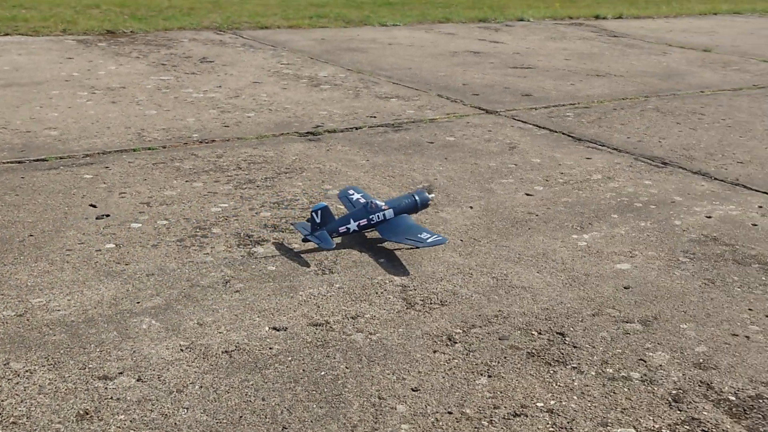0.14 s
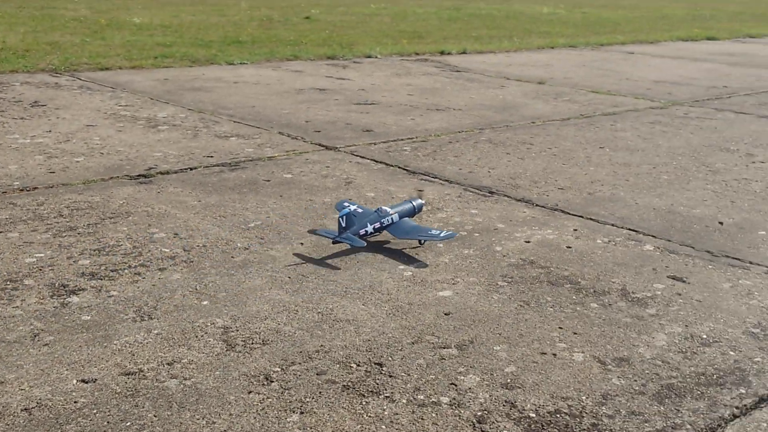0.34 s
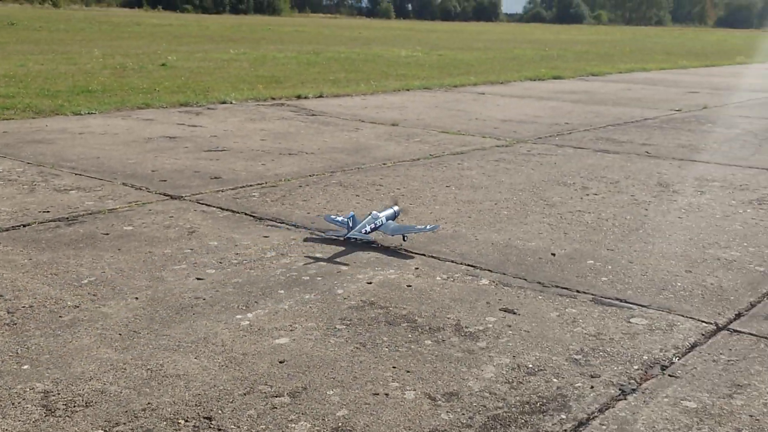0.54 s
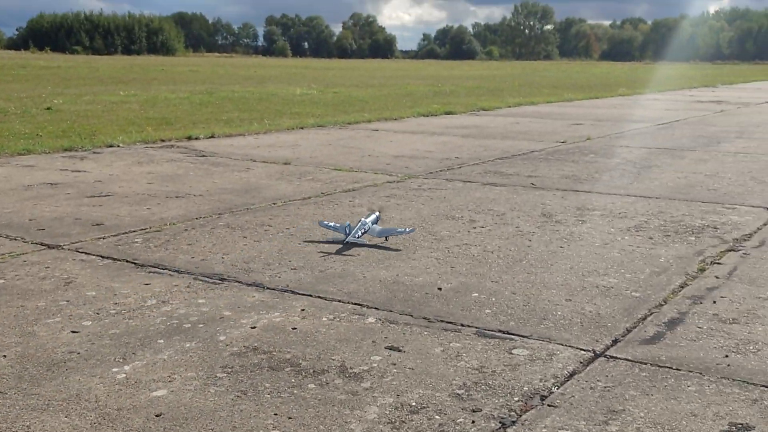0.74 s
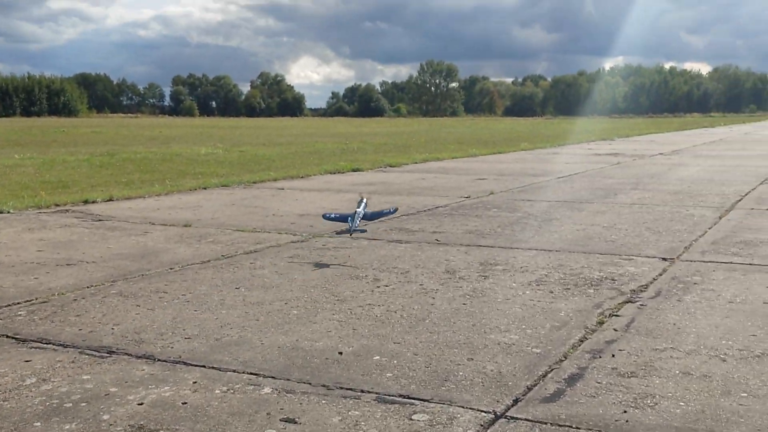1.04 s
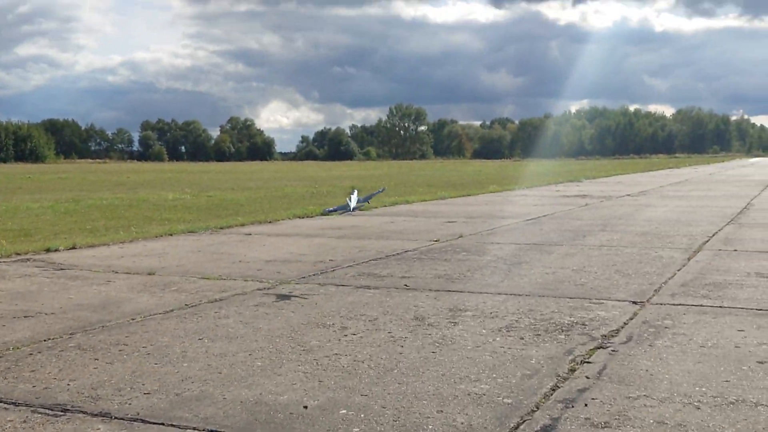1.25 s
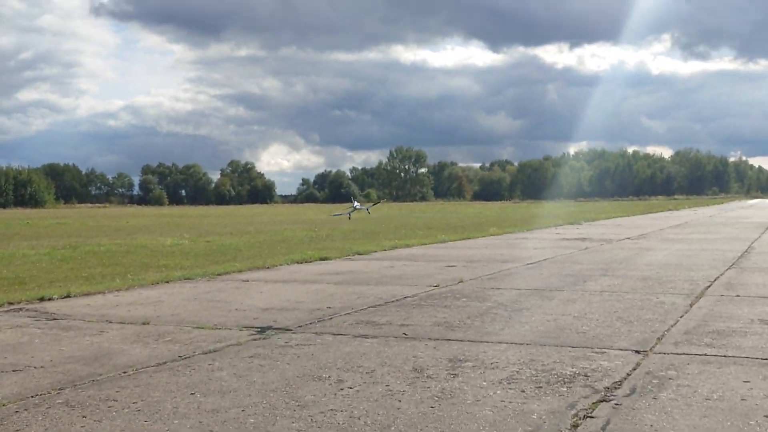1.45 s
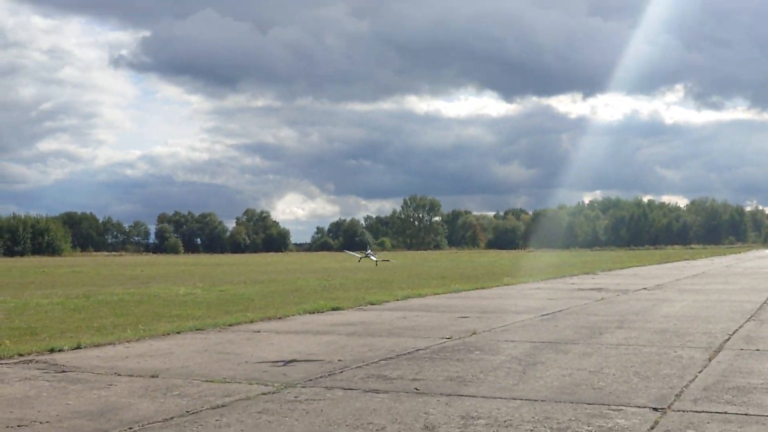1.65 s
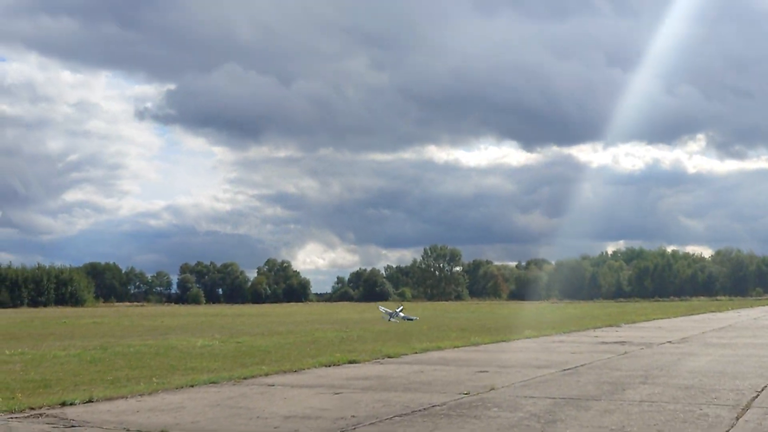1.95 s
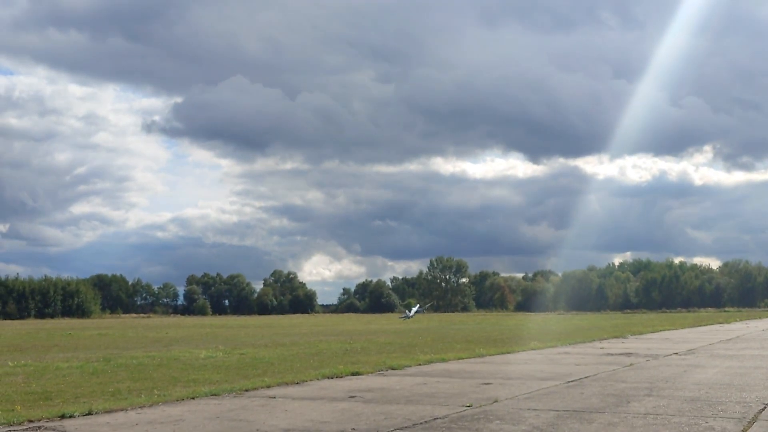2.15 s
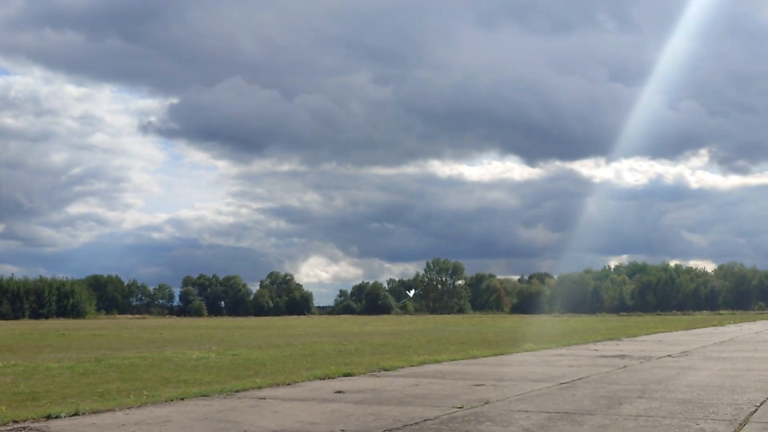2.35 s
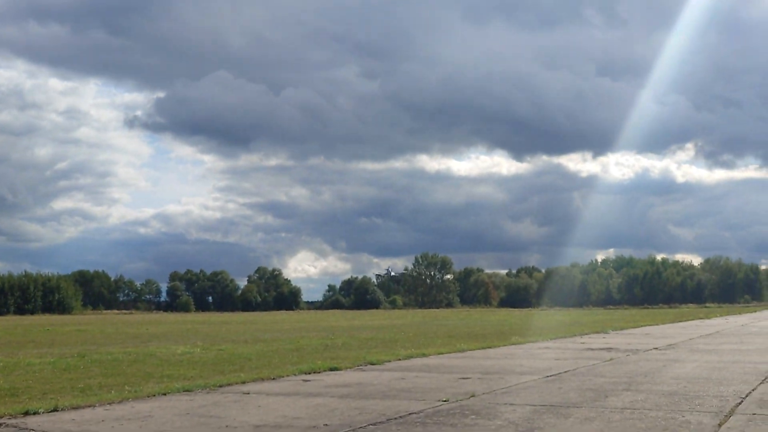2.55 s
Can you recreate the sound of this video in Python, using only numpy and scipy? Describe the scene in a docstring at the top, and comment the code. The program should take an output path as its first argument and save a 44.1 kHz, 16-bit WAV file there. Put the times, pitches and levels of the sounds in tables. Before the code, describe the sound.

A small electric model plane starts close with a shrill whine, propeller rush and wheels clattering over concrete, then lifts off and fades to a faint wavering whine; wind rumbles on the microphone in an open field.

```python
"""On an open field, a small electric model plane runs up a concrete strip, lifts off and climbs away.
Motor whine, bearing tones and whirr follow the shaft speed; at eased throttle the speed controller sings.
Blade-chopped noise makes the propeller wash, which fades with distance.
Grit and joints under the wheels set the foam airframe ringing.
Wind rumbles and flutters at the microphone, with a few dull knocks close by and a faint open-air floor."""
import sys
import numpy as np
from scipy import signal
from scipy.fft import rfft, irfft
from scipy.io import wavfile
from scipy.ndimage import uniform_filter1d, map_coordinates

SR = 44100
rng = np.random.default_rng(int(sys.argv[2]) if len(sys.argv) > 2 else 0)


def unload_audio(sound):
    """Save the sound as a 16-bit wav file, at the path given as the first command line argument."""
    columns = np.transpose(np.atleast_2d(sound))
    # keep every value between -1 and 1, then stretch to whole-number steps
    steps = np.round(np.clip(columns, -1, 1) * 32767)
    wavfile.write(sys.argv[1], SR, steps.astype(np.int16))


N = 119070
T = np.arange(N) / SR  # s
WHINE_ORDER = 42  # whine cycles per shaft turn

# whirr of the motor in flight, which also leads its airborne tones: t/s, level/dB
WHIRR_LEVEL = [(0, -67), (1.3, -54.5), (1.55, -52.5), (1.75, -61.5), (1.92, -70), (2.1, -65), (2.3, -55.5),
               (2.42, -55.5), (2.55, -60.5), (2.7, -68.5)]


def motor(shaft):
    """Magnetic whine, two bearing tones, and weaker tones that swell as they cross resonances in flight."""
    # whine: t/s, level/dB
    whine_level = [(0, -35), (.05, -28.5), (.13, -29.5), (.29, -37.5), (.5, -40.5), (.63, -50), (.69, -48),
                   (.82, -42.5), (1.16, -48.5), (1.22, -44.5), (1.33, -53), (1.57, -52.5), (1.61, -67),
                   (1.72, -69), (1.9, -74), (2.03, -60), (2.1, -79), (2.15, -65), (2.22, -55),
                   (2.32, -45.5), (2.44, -57.5), (2.7, -67)]
    # upper and lower bearing tone: t/s, level/dB
    bearing_level = [(0, -61), (.3, -49.5), (.6, -49.5), (1.0, -53), (1.3, -61.5), (1.5, -65), (1.58, -64),
                     (1.67, -62.5), (1.76, -73), (1.87, -69), (1.98, -105), (2.2, -76), (2.55, -85),
                     (2.7, -92)]
    low_bearing_level = [(0, -48), (1.1, -54), (1.5, -83), (1.72, -78), (1.98, -79), (2.19, -76),
                         (2.34, -63), (2.47, -69), (2.7, -76)]
    # weaker shaft and bearing tones: multiple of the shaft rate, relative level/dB on the ground,
    # level/dB relative to each other in the air
    weak_tones = [(3.037, -60, 3), (4.02, -49, 4.5), (4.315, -50.5, -25), (5.72, -50, -20),
                  (6.59, -53.5, -9), (9.12, -49, -16), (13.06, -54.5, 7), (15.98, -51, -12),
                  (20.72, -60, 0), (22.3, -58, -9), (30.4, -60, -8), (33.1, -84, -1), (33.36, -81, -8.5),
                  (34.5, -81, -4.5), (37.3, -61, 8.5)]
    # fade of the ground tones, heard close by: t/s, relative level/dB
    nearness = [(0, 1.5), (.7, -3), (1.2, -11.5), (1.45, -20.5), (1.7, -52), (2.7, -60)]
    # resonances that the airborne tones cross: f/Hz, relative level/dB
    tone_colour = [(300, -15), (520, -17.5), (850, -8), (1350, 3), (1550, -19), (2200, -23), (2750, -1),
                   (3100, -5.5), (3600, 3), (4050, -14), (4420, 3), (4800, -4.5), (5500, -12)]
    bearing_order, low_bearing_order = 26.5, 10.35  # multiples of the shaft rate
    waver_db, air_tones_db = 4, -5.5  # spread of each weak tone; airborne tones against the whirr

    whine = from_db(curve(whine_level) + 1.0 * drift(24)) * tone(WHINE_ORDER * shaft, jitter=0.00071)
    bearing = from_db(curve(bearing_level) + 3.0 * drift(45)) * tone(bearing_order * shaft, jitter=0.0038)
    low_level = from_db(curve(low_bearing_level) + 2.0 * drift(15))
    low_bearing = low_level * tone(low_bearing_order * shaft, jitter=0.0051)
    ground, air = 0, 0
    for multiple, ground_db, air_db in weak_tones:
        partial = from_db(waver_db * drift(13.7)) * tone(multiple * shaft, jitter=0.00701)
        ground = ground + from_db(ground_db) * partial
        air = air + from_db(air_db) * partial
    close_tones = from_db(curve(nearness)) * ground
    flying_tones = from_db(curve(WHIRR_LEVEL) + air_tones_db) * coloured(air, tone_colour)
    return whine + bearing + low_bearing + close_tones + flying_tones


def controller(shaft):
    """Steady switching tone at part throttle, with a sideband each side that follows the shaft."""
    # switching tone: t/s, level/dB
    switching_level = [(0, -110), (1.59, -100), (1.635, -53.5), (1.685, -65), (1.73, -52.5), (1.8, -47),
                       (1.9, -64.5), (1.935, -49), (1.99, -47), (2.035, -65), (2.07, -51.5), (2.17, -52),
                       (2.33, -61.5), (2.41, -53.5), (2.53, -72), (2.57, -55.5), (2.64, -46.5), (2.7, -51)]
    switch_hz, sideband_order, sideband_db = 7827, 4, -21.5
    sides = 0
    for sign in (-1, 1):
        sides = sides + tone(switch_hz + sign * sideband_order * shaft, jitter=0.00087)
    carrier = tone(switch_hz, jitter=0.00076)
    return from_db(curve(switching_level)) * (carrier + from_db(sideband_db) * sides)


def whirr(shaft):
    """Bearing and blade noise, partly the same on each turn, gliding through fixed resonances."""
    # resonances: f/Hz, relative level/dB per Hz
    whirr_colour = [(250, -21.5), (480, -7), (700, -14), (1000, -6.5), (1350, 1.5), (1600, -9.5),
                    (2150, -21), (2650, -13), (3100, -12), (3800, -5), (4350, 7), (4850, -8), (5900, -3),
                    (6800, -6.5), (8500, -5.5), (9900, -35), (11000, -26), (13000, -38)]
    turn_echo = 0.2  # share that repeats from turn to turn
    top = shaft.max()
    turn = int(SR / top)  # samples per turn at top speed
    x = rng.standard_normal(N)
    x = x + turn_echo * np.roll(x, turn) + turn_echo ** 2 * np.roll(x, 2 * turn)
    # read the noise more slowly as the shaft slows
    gliding = map_coordinates(x, [np.cumsum(shaft) / top], order=3, mode="wrap")
    return from_db(curve(WHIRR_LEVEL)) * coloured(gliding, whirr_colour)


def propeller(shaft):
    """Turbulent wash, chopped by each passing blade."""
    # body of the wash and its hiss: t/s, level/dB
    wash_level = [(0, -38), (.12, -34.5), (.33, -32.5), (.4, -37.5), (.52, -36.5), (.7, -35.5), (.8, -36.5),
                  (.91, -34.5), (1.05, -37.5), (1.2, -38), (1.3, -44), (1.4, -52), (1.55, -59),
                  (1.66, -69.5), (1.8, -84), (2.7, -105)]
    hiss_level = [(0, -51), (.3, -49.5), (.45, -41), (.62, -44), (.8, -42), (1.0, -46), (1.2, -51.5),
                  (1.35, -55), (1.55, -57.5), (1.7, -59), (1.82, -68), (2.7, -97)]
    # their colours: f/Hz, relative level/dB per Hz
    wash_colour = [(100, -11), (300, -18.5), (450, -11.5), (600, -1.5), (700, -4), (1000, 3), (1450, -1.5),
                   (1750, -1), (2300, -3.5), (3200, -11), (4800, -12), (7000, -12.5), (16000, -25)]
    hiss_colour = [(1500, -13), (3500, 10), (4300, -4), (4900, -1.5), (5900, 5), (7000, -5), (9300, 10),
                   (10100, 2), (11400, 10), (12800, -8), (16000, -0.5)]
    blades, chop_depth, flutter_db = 2, 0.13, 1.55
    chop = rms_one(1 + chop_depth * np.cos(2 * np.pi * blades * np.cumsum(shaft) / SR))
    body = from_db(curve(wash_level)) * noise(wash_colour)
    hiss = from_db(curve(hiss_level)) * noise(hiss_colour)
    return (body + hiss) * chop * from_db(flutter_db * drift(48))


def wheels():
    """Grit and bumps shake the airframe through the landing gear."""
    # wheels rolling on grit: t/s, level/dB
    roll_level = [(0, -39), (.15, -36), (.2, -36.5), (.28, -37), (.34, -29), (.4, -38.5), (.45, -32.5),
                  (.5, -44), (.57, -30.5), (.61, -39), (.74, -36), (.82, -48), (1.0, -56), (1.08, -65),
                  (2.7, -120)]
    # bumps and joints: t/s, blow level/dB, rattle decay/s, crack level/dB relative to the blow before doubling
    bumps = [(.187, -19.5, 0.0028, -2), (0.201, -14.5, 0.0019, -8), (0.234, -19.5, 0.0056, -5),
             (.324, -20.5, 0.011, 2), (0.356, -19.5, 0.0044, 1.5), (0.434, -19.5, 0.017, -2),
             (0.471, -25, 0.0091, 5), (0.52, -21, 0.0094, -1), (0.557, -19.5, 0.015, -14),
             (0.566, -22.5, 0.0086, -20), (0.579, -28, 0.0078, 7.5), (.719, -19.5, 0.0041, 3),
             (0.728, -35, .004, -4), (.958, -30, 0.0022, 14.5), (.984, -27, 0.0017, 10),
             (.998, -27, 0.0032, 8), (1.365, -36, 0.0045, -9)]
    # modes of the foam airframe: f/Hz, level/dB, t60/s
    airframe = [(440, -16.5, 0.011), (650, -9.5, 0.012), (820, -11.5, 0.014), (1204, -12.5, 0.016),
                (1460, -13, .014), (1840, -13, 0.013), (2480, -5, 0.0051), (2960, -4.5, 0.0036),
                (4540, -9, 0.0022), (5670, -11, 0.0057)]
    grit_per_s, grit_spread_db, grit_crack_db = 900, 4, -5
    rattle_per_s, rattle_db, rattle_rise_s = 6000, -8.5, 0.0028

    sizes = from_db(grit_spread_db * np.minimum(rng.exponential(1, N), 4)) * rng.choice([-1, 1], N)
    grit = sizes * (rng.random(N) < grit_per_s / SR)
    contact = ring(grit, airframe) + from_db(grit_crack_db) * crack(grit)
    rolling = from_db(curve(roll_level)) * rms_one(contact)

    blows, ticks = np.zeros(N), np.zeros(N)
    rattle = from_db(rattle_db) * rng.standard_normal(N) * (rng.random(N) < rattle_per_s / SR)
    for s, db, length, crack_db in bumps:
        # the rattle swells just before the hit and dies away after it
        hit = rattle * np.exp(-np.abs(T - s) / np.where(T > s, length, rattle_rise_s))
        hit[int(s * SR)] = 0.92  # the hit itself
        blows += from_db(db) * hit
        ticks += from_db(db + crack_db) * hit
    return rolling + ring(blows, airframe) + 2 * crack(ticks)


def crack(clicks):
    """The dry tick of a hard contact, without the low thump or the extreme treble."""
    tick = signal.sosfilt(signal.butter(1, 1500, "high", fs=SR, output="sos"), clicks)
    return signal.sosfilt(signal.butter(2, 11400, fs=SR, output="sos"), tick)


def wind():
    """Gusts on the microphone: a low rumble that swells and dips, with short higher flutters."""
    # gusts: t/s, relative level/dB
    gusts = [(0, -45), (.05, -47.5), (.1, -33), (.17, -56), (.26, -32.5), (.35, -53), (.41, -53),
             (.46, -41), (.55, -48), (.67, -31), (.77, -51), (.82, -35), (.88, -49), (.94, -40),
             (1.02, -60), (1.09, -36.5), (1.13, -46), (1.21, -39), (1.29, -36), (1.33, -56), (1.45, -39.5),
             (1.58, -53), (1.65, -46), (1.72, -60.5), (1.83, -42), (1.9, -51.5), (1.98, -45.5),
             (2.04, -54.5), (2.25, -46), (2.37, -55.5), (2.55, -46), (2.63, -44.5), (2.7, -41)]
    # short flutters: t/s, level/dB, Gaussian half length/s, upper edge f/Hz
    buffets = [(0.034, -57.5, 0.049, 320), (0.095, -50, 0.014, 170), (0.157, -39.5, 0.013, 225),
               (0.282, -43, 0.021, 227), (0.352, -46, 0.019, 260), (0.468, -44, 0.023, 248),
               (0.61, -38.5, 0.029, 357), (.657, -27.5, 0.011, 700), (0.698, -28, 0.01, 384),
               (0.95, -42, .016, 332), (1.094, -67, 0.004, 151), (1.21, -47, 0.0094, 220),
               (1.283, -49, 0.017, 274), (1.397, -49.5, 0.0092, 297), (1.456, -47, 0.026, 320),
               (1.544, -50.5, 0.011, 373), (1.65, -58, .015, 130), (1.83, -42, 0.0084, 123),
               (2.159, -58, 0.0095, 179)]
    # colours of rumble and flutter: f/Hz, relative level/dB per Hz
    wind_colour = [(14, -5), (35, 4.5), (60, -4), (110, -13.5), (170, -25), (300, -43), (1000, -65)]
    buffet_colour = [(50, -7.5), (110, 4.5), (170, -1), (240, 0), (340, -1.5), (600, -2.5), (1500, -44),
                     (5000, -43)]
    wind_db, lumps_db = -0.5, 1  # overall trim; spread of the chance lumps
    level = from_db(wind_db + curve(gusts) + lumps_db * drift(14.5))
    out = level * evened(noise(wind_colour))
    eddies = noise(buffet_colour)
    for s, db, half, edge_hz in buffets:
        low_pass = signal.butter(2, edge_hz, fs=SR, output="sos")
        flutter = evened(signal.sosfilt(low_pass, eddies))
        out = out + from_db(db) * np.exp(-.5 * ((T - s) / half) ** 2) * flutter
    return out


def knocks():
    """Dull little knocks close to the microphone: single clicks set a few short modes ringing."""
    # knocks: t/s, click level/dB
    knock_times = [(1.342, -27.5), (1.736, -43), (2.629, -43)]
    # what they set ringing: f/Hz, level/dB, t60/s
    knock_modes = [(496, -11, 0.028), (640, -8, 0.015), (880, -12, 0.017)]
    clicks = np.zeros(N)
    for s, db in knock_times:
        clicks[int(s * SR)] = from_db(db)
    return ring(clicks, knock_modes)


def open_air():
    """The steady, faint background of the field, as coloured noise."""
    # background: f/Hz, relative level/dB per Hz
    floor_colour = [(100, -19), (250, -25), (450, -5), (900, -5.5), (1350, -9), (1600, -19), (2700, -25),
                    (3200, -1), (4300, 5.5), (5700, -3), (8200, 1), (10100, -8), (11200, 1), (12300, -19),
                    (13500, -20), (15500, -9)]
    return from_db(-62.5) * noise(floor_colour)


def from_db(db):
    """Decibels to gain."""
    return 10 ** (np.asarray(db) / 20)


def rms_one(x):
    """Scale to unit rms."""
    return x / np.sqrt(np.mean(x ** 2) + 1e-20)


def curve(rows):
    """Join (s, value) rows by straight lines."""
    return np.interp(T, *np.transpose(rows))


def drift(rate):
    """Slow chance wander with rms 1: noise smoothed twice below a rate in Hz."""
    r = np.exp(-2 * np.pi * rate / SR)
    smooth = signal.lfilter([1], [1, -2 * r, r * r], rng.standard_normal(N + SR))
    return rms_one(smooth[SR:])


def tone(hz, jitter):
    """A sine whose pitch trembles slightly; rms 1."""
    turns = np.cumsum(hz * (1 + jitter * drift(58))) / SR
    return np.sqrt(2) * np.sin(2 * np.pi * (turns + rng.random()))


def ring(clicks, modes):
    """Clicks set a table of decaying modes ringing, with alternating signs."""
    out = 0
    for k, (hz, db, t60) in enumerate(modes):
        r = np.exp(-np.log(1000) / (t60 * SR))
        w = 2 * np.pi * hz / SR
        mode = signal.lfilter([0, np.sin(w)], [1, -2 * r * np.cos(w), r * r], clicks + 1e-18)
        out = out + (-1) ** k * from_db(db) * mode
    return out


def noise(colour):
    """Coloured noise; rms 1."""
    return coloured(rng.standard_normal(N), colour)


def coloured(x, colour):
    """Shape a sound's spectrum by (Hz, dB) points, falling away below the first; rms 1."""
    at, db = np.transpose(colour)
    hz = np.maximum(np.arange(N // 2 + 1) * SR / N, 1)
    gain = from_db(np.interp(np.log(hz), np.log(at), db)) * np.minimum(hz / at[0], 1) ** 2
    return rms_one(irfft(rfft(x) * gain, N))


def evened(x):
    """Hold a rumble near a steady strength, so that its level curve shapes it."""
    return x / np.sqrt(uniform_filter1d(x ** 2, size=1800) + 0.037)


def scene():
    """The plane, the wind and the open field."""
    # motor speed, as the pitch of its whine: t/s, f/Hz
    whine_pitch = [(0, 5488), (.05, 5640), (.12, 5775), (.2, 5850), (.32, 5900), (.97, 5890), (1.3, 5923),
                   (1.62, 5925), (1.694, 5450), (1.77, 5060), (1.86, 4730), (1.98, 4470), (2.08, 4370),
                   (2.125, 4540), (2.164, 4830), (2.27, 5232), (2.35, 5407), (2.42, 5480), (2.48, 5470),
                   (2.564, 5315), (2.63, 5080), (2.7, 4900)]
    shaft = uniform_filter1d(curve(whine_pitch), size=1500, mode="nearest") / WHINE_ORDER  # turns per s
    plane = motor(shaft) + controller(shaft) + whirr(shaft) + propeller(shaft) + wheels()
    return (plane + wind() + knocks() + open_air())[None]


def record(dry):
    """A steep elliptic low-pass cuts the top at 15.8 kHz."""
    return signal.sosfilt(signal.ellip(12, .1, 80, 15800, fs=SR, output="sos"), dry)


dry = scene()
out = record(dry)
unload_audio(out)
```